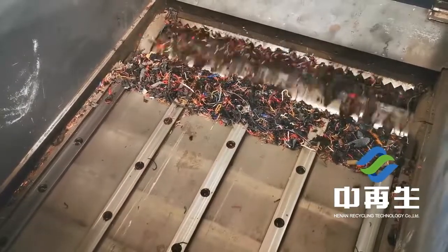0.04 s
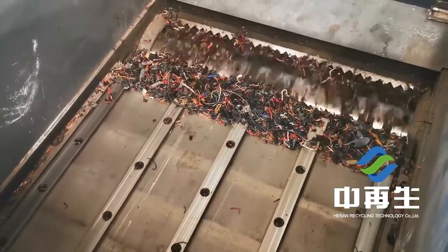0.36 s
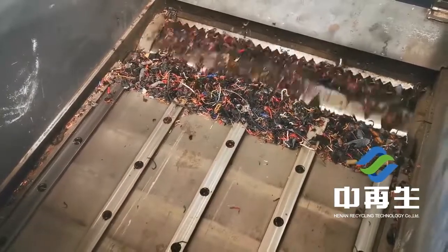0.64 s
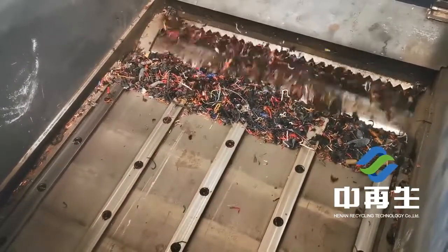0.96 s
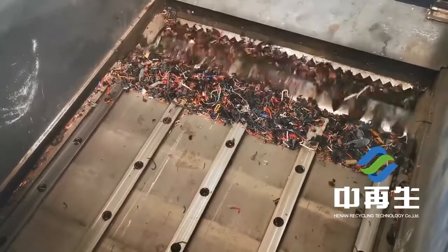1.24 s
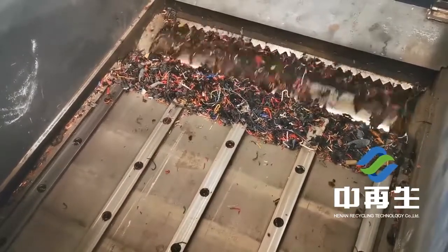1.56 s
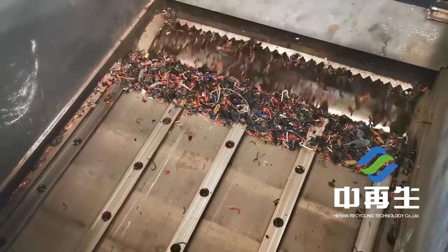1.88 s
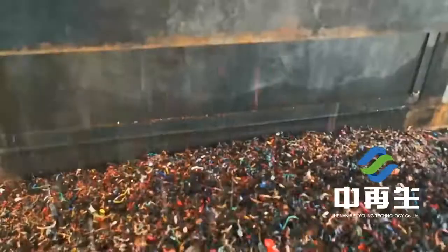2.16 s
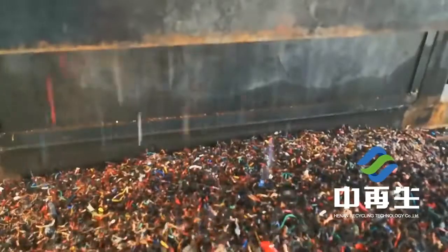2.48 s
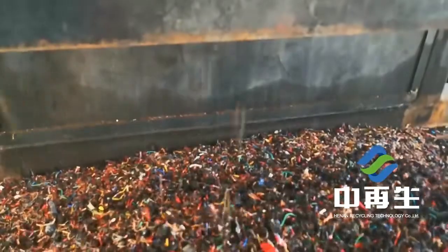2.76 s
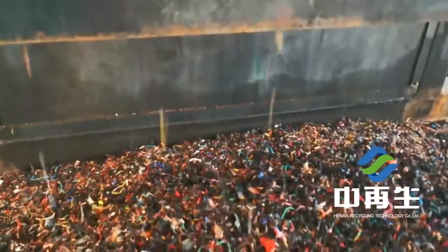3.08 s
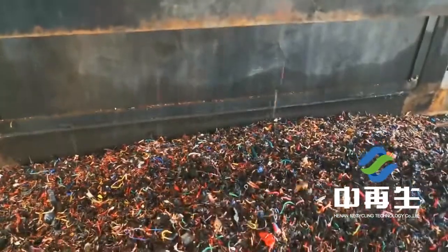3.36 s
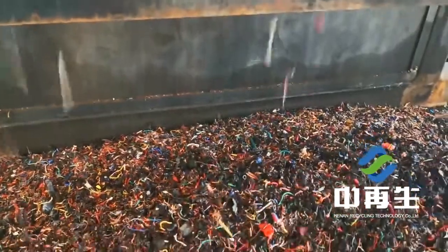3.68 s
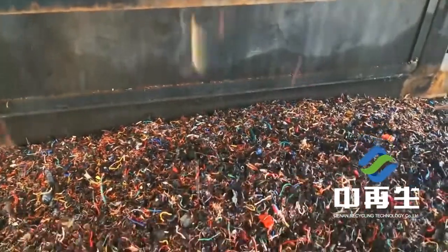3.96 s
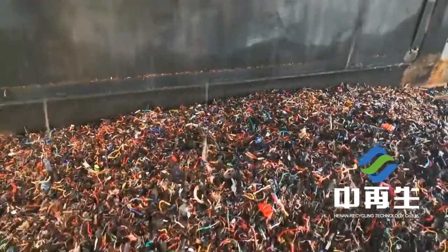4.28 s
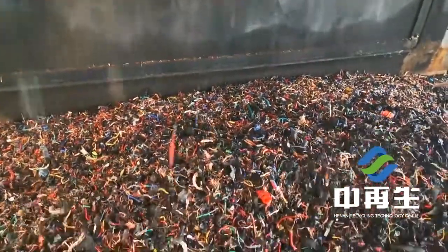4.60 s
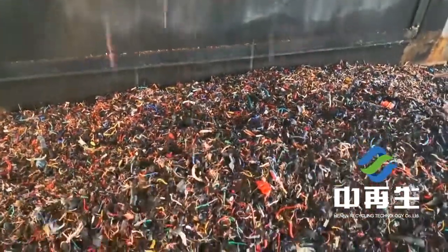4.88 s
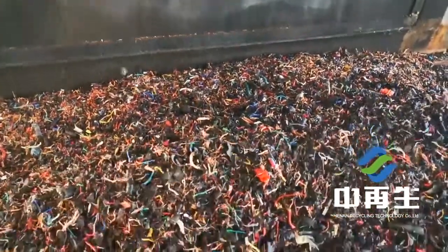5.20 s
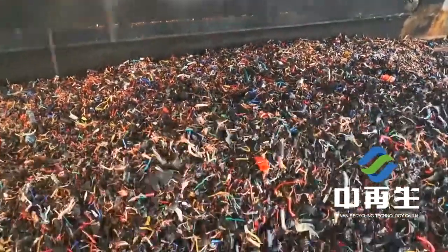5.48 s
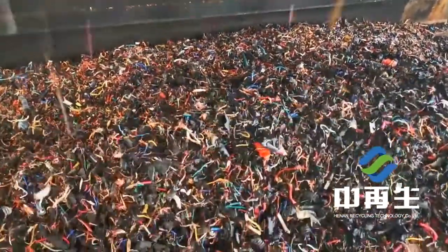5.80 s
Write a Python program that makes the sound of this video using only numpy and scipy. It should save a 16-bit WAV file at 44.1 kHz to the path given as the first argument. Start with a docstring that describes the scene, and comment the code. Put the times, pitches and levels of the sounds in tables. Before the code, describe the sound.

From the start, an industrial shredder is heard close to its feed chamber. The rotor throbs deeply and the steel housing rumbles and chugs unevenly. Knives tear through cable wire in quick, crunching, snapping surges, with dull knocks, bright clatter and a few short squeals, mostly in the first second. At about 2.1 seconds everything cuts to silence.

At about 2.4 seconds the sound returns at the discharge bin. The steel walls give a low, pulsing drone while chopped wire patters densely onto a pile over dull grinding, with scattered crisp ticks. Heavier scraps thud and clang now and then, most clearly near 2.7 and 5.5 seconds. A thin, high whine peaks around 4 seconds and fades by 4.5. The chugging is strongest near 3 seconds and from 4.2 to 5, dips briefly, then carries on with the patter until the end at about 6 seconds.

```python
"""At an industrial shredder grinding cable wire: by the open feed chamber, then at the discharge bin.
At the feed, the rotor throbs and shakes the chugging steel housing, while its knives tear the wire in
crunching surges and knock on thick pieces. A short silence separates the two places.
At the bin, the walls drone and chug, chopped wire patters on the pile, heavy scraps thud on the floor
and the drive's thin whine comes and goes."""
import sys
import numpy as np
from scipy import signal
from scipy.fft import rfft, irfft, next_fast_len
from scipy.io import wavfile
from scipy.ndimage import uniform_filter1d

SR = 44100
rng = np.random.default_rng(int(sys.argv[2]) if len(sys.argv) > 2 else 0)


def to_wav(s):
    """Save 16-bit WAV."""
    ch = np.atleast_2d(s).T  # columns
    pcm = np.round(np.clip(ch, -1, 1) * 32767)  # PCM
    wavfile.write(sys.argv[1], SR, pcm.astype(np.int16))


N = 266364
T = np.arange(N) / SR
FFT_SIZE = next_fast_len(N + 8192)
HZ = np.maximum(np.arange(FFT_SIZE // 2 + 1) * SR / FFT_SIZE, 1)
FEED_END_S, BIN_START_S = 2.09, 2.365
MIC_SPACING_M, SOUND_M_PER_S = 0.11, 343

# The body of the steel housing. Each row: pitch in Hz, nominal width in Hz, relative level in dB.
HOUSING_RESONANCES = [(69.1, 8.8, -27.5), (83, 14, -31.5), (112, 22, -33), (141.7, 19, -28.5),
                      (162.4, 8.3, -28), (175.3, 7, -30.5), (185.6, 30, -29.5), (210, 75, -30.5),
                      (275, 28, -33.5), (321, 45, -32), (444, 63, -36.5)]
# Hard bites make the steel chug. Each row: middle and length in seconds, pitch in Hz, level in dB.
HARD_BITES = [(0.042, 0.059, 166.4, -14), (0.086, 0.028, 160.4, -13.5), (0.285, 0.073, 165.6, -15.5),
              (0.38, 0.088, 168.6, -15.5), (0.73, 0.076, 158.2, -14.5), (0.8, 0.078, 163, -15.5),
              (1.076, 0.047, 161.4, -14.5), (1.301, 0.051, 152.7, -15), (1.339, .043, 162, -17),
              (1.545, 0.071, 162.2, -16), (1.634, 0.04, 163.3, -16), (1.693, .076, 163, -15),
              (2.604, 0.037, 157, -14), (2.678, 0.084, 151, -15), (2.869, 0.074, 164.6, -14),
              (2.925, 0.063, 153.5, -13), (2.975, 0.046, 150, -10.5), (3.011, 0.038, 146, -16),
              (3.061, 0.046, 156.2, -14.5), (3.115, 0.064, 159.2, -15), (3.338, 0.15, 148.6, -15.5),
              (4.164, 0.044, 151, -14.5), (4.237, 0.081, 160.2, -14), (4.299, 0.038, 147, -12.5),
              (4.347, 0.048, 151, -9.5), (4.401, 0.036, 138.4, -12.5), (4.432, .038, 147.9, -14),
              (4.491, 0.086, 158.5, -11), (4.542, 0.064, 146.2, -12.5), (4.669, 0.041, 151.9, -16),
              (4.721, 0.053, 143, -14), (4.795, 0.11, 151.5, -11.5), (4.863, 0.095, 156, -14),
              (4.934, .066, 159.3, -14.5), (5.474, 0.067, 156, -16.5), (5.986, 0.042, 155.7, -14.5)]
# The knives tear into a bunch of wire. Each row: start and length in seconds, snapping level in dB.
WIRE_TEARS = [(0.052, 0.06, -38), (0.188, 0.05, -37), (0.239, 0.045, -37), (0.306, 0.06, -37.5),
              (0.378, 0.083, -37), (0.482, 0.016, -34.5), (0.547, 0.084, -34), (0.743, 0.055, -36),
              (0.893, 0.05, -35), (0.955, 0.015, -30.5), (1.259, 0.072, -35.5), (1.427, 0.037, -32.5),
              (1.564, 0.093, -35.5), (1.776, 0.018, -42.5)]
# The colour of breaking wire at the feed. Each row: frequency in Hz, relative gain in dB.
FEED_WIRE_EQ = [(60, -8.5), (350, -1.5), (550, -1), (750, -4.5), (1150, -6), (1500, -10.5), (1900, -11.5),
                (2400, -12.5), (3200, -17.5), (5000, -17.5), (7500, -27), (9000, -22.5), (11000, -32),
                (15500, -35)]
# Knives knock on thick pieces. Each row: start in seconds, level in dB.
KNIFE_KNOCKS = [(.017, -30), (0.176, -19.5), (.415, -20), (0.55, -21.5), (0.703, -24), (.743, -25),
                (.889, -26), (1.008, -30), (1.092, -29.5), (1.193, -25), (1.339, -23)]
# Hard lumps clatter against the steel. Each row: start in seconds, level in dB.
LUMP_HITS = [(.254, -33), (.335, -28.5), (0.4902, -35), (.606, -30.5), (1.268, -35), (1.31, -24.5),
             (1.428, -31.5), (1.447, -28.5), (1.588, -31.5), (1.655, -28)]
# Wire squeals on the blades. Each row: start and length in seconds, pitch in Hz, level in dB.
BLADE_SQUEALS = [(0.08, 0.026, 2020, -32.5), (0.23, 0.056, 2490, -43), (0.392, .012, 2350, -33),
                 (.487, .014, 2170, -40), (.56, .055, 2200, -44.5), (1.79, 0.011, 13170, -48.5)]
# Thin rings of the cutting chamber. Each row: pitch in Hz, nominal width in Hz, relative level in dB.
CHAMBER_RESONANCES = [(1082, 8.1, -49), (1864, 48, -45), (2106, 8.4, -48.5)]

# How hard the machine shakes the bin walls. Each row: time in seconds, drone level in dB.
DRONE_LEVELS = [(2.38, -24.5), (2.64, -24), (2.79, -21.5), (2.95, -20), (3.2, -23), (3.34, -19),
                (3.57, -21.5), (3.72, -26.5), (4.03, -22.5), (4.2, -20.5), (4.34, -22.5), (4.52, -17.5),
                (4.62, -20.5), (4.81, -15), (4.95, -19), (5.24, -33.5), (5.48, -22.5), (6.04, -20)]
# Strong, lightly damped wall modes that beat together. Each row: pitch in Hz, relative level in dB.
STRONG_WALL_MODES = [(129.4, -6.5), (150.7, -1), (166.6, -5), (174.5, -16.5)]
# Weaker wall modes under them. Each row: pitch in Hz, nominal width in Hz, relative level in dB.
WEAK_WALL_MODES = [(83, 1.5, -22), (102.4, 3.9, -17), (131, 13, -11), (153, 82, -15), (173.6, 12, -16),
                   (209.9, 9.5, -15)]
# The colour of chopped wire at the bin. Each row: frequency in Hz, relative gain in dB.
BIN_WIRE_EQ = [(60, -36), (350, 5.5), (550, 2), (720, 4), (900, -3), (1060, -3), (1500, -8), (2100, -8.5),
               (2500, -14), (3200, -17), (4400, -15.5), (5400, -17.5), (7800, -27.5), (9100, -20.5),
               (11000, -24.5), (15500, -32)]
# The stream of falling wire. Each row: time in seconds, patter level in dB.
PATTER_LEVELS = [(2.37, -38.5), (2.7, -37.5), (3.0, -38), (3.27, -38), (4.2, -38), (4.37, -39), (4.88, -39),
                 (5.1, -38.5), (5.42, -38.5), (5.66, -38.5), (6.04, -38.5)]
# Heavy scraps land. Each row: start in seconds, then hollow thud, bright clang and plate ring in dB.
SCRAP_DROPS = [(2.489, -38, -36.5, -40), (2.728, -25, -28, -28), (2.908, -30, -34.5, -44),
               (3.02, -33, -46, -40), (3.234, -28.5, -36, -49), (3.42, -29, -36, -32),
               (3.819, -32, -34.5, -37), (4.024, -34, -36, -34), (4.463, -30, -45, -32),
               (4.765, -30, -34, -38), (5.547, -27.5, -32.5, -23), (5.578, -31.5, -40, -33),
               (5.849, -35, -36.5, -48)]
# The hollow voice of the bin floor. Each row: pitch in Hz, nominal width in Hz, relative level in dB.
FLOOR_RESONANCES = [(465, 120, -4.5), (690, 130, -3), (1260, 590, -8)]
# Single bits of copper tick on the pile. Each row: start in seconds, level in dB.
COPPER_TICKS = [(2.4238, -33), (2.4632, -36), (2.726, -32), (2.7555, -38), (2.9376, -43), (3.1117, -36),
                (3.2728, -33), (3.4524, -37), (3.9024, -38), (5.2459, -35), (5.3501, -38), (5.4075, -37),
                (5.857, -35), (5.9177, -41)]
# The drive's whine comes and goes. Each row: time in seconds, level in dB.
WHINE_LEVELS = [(2.37, -49.5), (2.9, -53.5), (3.3, -47), (3.65, -50), (3.95, -45), (4.2, -47.5), (4.5, -61),
                (6.04, -63)]
# Rough singing around the whine. Each row: pitch in Hz, nominal width in Hz, relative level in dB.
SCRAPE_RESONANCES = [(2085, 60, -64), (2240, 340, -62), (2277, 110, -56), (2345, 59, -63)]
# The rumble of the machine frame. Each row: pitch in Hz, nominal width in Hz, relative level in dB.
FRAME_RESONANCES = [(45.6, 7.4, -44.5), (78.6, 12, -36), (240, 19, -39.5), (286.7, 22, -39),
                    (321.7, 38, -40.5), (459, 40, -44)]

# The right microphone's duct rings most at odd multiples of its quarter-wave tone.
# Each row: pitch in Hz, nominal width in Hz, ring level in dB at the feed, then at the bin.
DUCT_RESONANCES = [(2286, 498, 6.5, 15.5), (2930, 210, 3, 8), (6755, 1360, 8.5, 15), (10900, 580, 14, 17),
                   (12300, 1940, 7, 14), (15480, 2000, 0.5, 13.5)]
# The stereo lean, apart from the duct. Each row: frequency in Hz, right over left in dB.
STEREO_LEAN = [(60, -2.5), (170, -1.96), (500, 3), (1200, 2), (3500, -1.5), (9000, 0)]


def rotor(throb, throb_db=-26, shudder_db=-32.5):
    """The knife rows throb, and a second low tone of the machine beats against them."""
    return undb(throb_db) * throb + undb(shudder_db) * tone(44.5, waver=0.0089)


def housing(gain_db=-19, steady_s=0.11):
    """Countless cuts shake the steel: close modes beat, and the boom gives way to each chug."""
    steel = diffuse(1, resonances(HOUSING_RESONANCES))
    slow_rms = np.sqrt(uniform_filter1d(steel.mean(0) ** 2, int(steady_s * SR)))
    rumble = undb(gain_db + wander(12)) * steel / slow_rms
    boom = shape(rumble, resonance(159, 70) ** 2)
    return rumble - boom + chugging(boom)


def chugging(droning, reach=1.28):
    """Each hard bite drives the walls at one pitch and ducks their drone for `reach` times its length."""
    middles, _, hz, _ = np.transpose(HARD_BITES)
    force = np.max([undb(db) * bump(middle, length) for middle, length, _, db in HARD_BITES], axis=0)
    duck = np.max([bump(middle, length * reach) for middle, length, _, _ in HARD_BITES], axis=0)
    return droning * (1 - duck) + force * tone(np.interp(T, middles, hz), waver=0.002)


def cutting(throb, grinding_db=-33, snapping_db=-37.5):
    """The knives grind the bundle and snap its copper strands, harder in every tear."""
    tearing = np.sqrt(sum((undb(db) * swell(start, length, attack=0.01, release=0.053)) ** 2
                          for start, length, db in WIRE_TEARS))
    grind = np.hypot(undb(grinding_db), undb(-2.5) * tearing)
    crunch = np.hypot(undb(snapping_db), tearing)
    bite = undb(0.46 * throb)  # the load rises each time a knife row passes
    dull, bright = wire_bands(FEED_WIRE_EQ, split_hz=780)
    grinding = diffuse(grind * bite * grains(rate=490, spread_db=-1.5, t60=0.048), dull)
    snapping = diffuse(crunch * grains(rate=1800, spread_db=0.3, t60=0.09), bright)
    crisp = unit(resonance(11000, 9000) * above(6000, order=2))
    crackle = diffuse(undb(-21) * crunch * grains(rate=240, spread_db=2.5, t60=0.008), crisp)
    strands = undb(-4) * crunch * pings(count=1100, low_hz=1493, high_hz=7500, cycles=16, spread_db=2.5)
    return grinding + snapping + crackle + strands


def knocks():
    """A knife meets a thick piece: a dull knock that rings the cutter block."""
    starts, levels_db = np.transpose(KNIFE_KNOCKS)
    dull = unit(resonance(360, 360) * above(230) * resonance(630, 1500))
    block = struck(starts, levels_db, hz=468, t60=0.087)
    return diffuse(blows(starts, levels_db, t60=0.019), dull) + block


def clatter():
    """Hard lumps hit the steel, each breaking in a quick run of bright cracks."""
    cracks = grains(rate=520, spread_db=1.5, t60=0.017)
    bright = unit(colour(FEED_WIRE_EQ) * above(1200, order=2) * resonance(4100, 9000))
    return diffuse(cracks * blows(*np.transpose(LUMP_HITS), t60=0.12), bright)


def squeals():
    """Wire scrapes on the blades in short bursts of narrow, pitched noise."""
    return sum(diffuse(undb(db) * swell(start, length, attack=0.0055, release=0.047),
                       unit(resonance(hz, 0.14 * hz) ** 2))
               for start, length, hz, db in BLADE_SQUEALS)


def bin_walls(drone, load):
    """The shaken walls sing and chug on beating tones, and weaker modes swell with the load."""
    singing = sum(undb(db) * tone(hz, waver=0.0088, sway_db=2.5) for hz, db in STRONG_WALL_MODES)
    jolts = undb(0.51 * wander(32))  # uneven bites make the drone throb
    strong = chugging(jolts * drone * singing / singing.std())
    weak = diffuse(undb(-21.5) * load ** 0.42, resonances(WEAK_WALL_MODES))
    return strong + weak


def chopped_wire(load, grinding_db=-34.5, clump_db=1.08):
    """Wire patters down in clumps over dull grinding; bits landing close by stand out in bunches."""
    dull, bright = wire_bands(BIN_WIRE_EQ, split_hz=1420)
    grind = undb(grinding_db) * load ** 0.15
    grinding = diffuse(grind * grains(rate=660, spread_db=-1, t60=0.1), dull)
    stream = fader(PATTER_LEVELS) * undb(clump_db * wander(21))
    patter = diffuse(stream * grains(rate=4000, spread_db=3.5, t60=0.089), bright)
    bunches = undb(-4.5 + 3.5 * np.tanh(wander(16)))
    near_bits = pings(count=900, low_hz=4000, high_hz=13500, cycles=18, spread_db=3.5)
    return grinding + patter + bunches * stream * near_bits


def scraps():
    """Heavy scraps thud and clang on the bin floor, whose plate rings briefly."""
    starts, thud_db, clang_db, ring_db = np.transpose(SCRAP_DROPS)
    thuds = diffuse(blows(starts, thud_db, t60=0.21), resonances(FLOOR_RESONANCES))
    plate = struck(starts, ring_db, hz=685, t60=0.1)
    rattle = grains(rate=450, spread_db=1, t60=0.025)  # loose pieces jump and settle after each drop
    metallic = unit(resonance(1700, 940) * above(900, order=2))
    clangs = diffuse(rattle * blows(starts, clang_db, t60=0.16), metallic)
    return thuds + plate + clangs


def ticks():
    """Single bits of copper hit the pile with a tiny, crisp tick."""
    crisp = unit(resonance(10000, 7500) ** 2 * above(5500, order=2))
    return diffuse(blows(*np.transpose(COPPER_TICKS), t60=0.015), crisp)


def drive(whine_hz=2235):
    """The drive whines with its octave; a fluttering scrape and a high rasp come and go with it."""
    strength = fader(WHINE_LEVELS)
    whine = tone(whine_hz, waver=0.001078, sway_db=-0.9)
    octave = undb(-11) * tone(2 * whine_hz, waver=0.00097)
    rubbing = (strength / strength.mean()) ** 0.51
    scrape = diffuse(undb(2 * wander(45)) * rubbing, resonances(SCRAPE_RESONANCES))
    spurts = undb(-56 + 4.1 * np.tanh(1.3 * wander(30)))
    rasp = diffuse(spurts * rubbing, unit(resonance(6670, 800) ** 2))
    return strength * (whine + octave) + scrape + rasp


def panel(rest_db=-47, swell_db=-29):
    """A bin panel with two low tones swells up, hums and settles."""
    shaken = undb(rest_db) + undb(swell_db) * swell(start=4.72, length=0.45, attack=0.32, release=0.27)
    return shaken * (tone(243, waver=0.00606) + undb(-7) * tone(212, waver=0.0283))


def frame():
    """The machine frame lays an even rumble under the bin."""
    return diffuse(0.9, resonances(FRAME_RESONANCES))


def chamber():
    """The cutting chamber rings thinly behind the knives."""
    return diffuse(0.71, resonances(CHAMBER_RESONANCES))


def microphones(sound, duct_db):
    """Each band leans to one side, and the right microphone hears through a short, ringing duct."""
    ring_power = sum((undb(db) * resonance(hz, width) ** 1.255) ** 2
                     for (hz, width, *_), db in zip(DUCT_RESONANCES, duct_db))
    lean = np.sqrt(colour(STEREO_LEAN))
    return np.array([shape(sound[0], 1 / lean), shape(sound[1], lean * np.sqrt(1 + ring_power))])


def wire_bands(eq, split_hz, ripple_hz=22.15):
    """Dull grinding and bright snapping filters, finely rippled by plate and room resonances."""
    knots = np.arange(0, SR / 2, ripple_hz)
    uneven = np.interp(HZ, knots, rng.standard_normal(4096)[:len(knots)])
    depth_db = 1.5 * above(515, order=2) * (2 - 1.1 * above(5000, order=1))  # deepest in the mids
    ripple = unit(undb(depth_db * uneven))
    gain, highs = colour(eq), above(split_hz, order=3)
    dull = unit(gain * np.sqrt(1 - highs ** 2) * above(300, order=2), (HZ > 300) & (HZ < 1200))
    bright = unit(gain * highs, (HZ > 1500) & (HZ < 12000))
    return ripple * dull, ripple * bright


def pings(count, low_hz, high_hz, cycles, spread_db):
    """Bits of wire at random moments: each rings for a few cycles at its own pitch, from its own side."""
    t = np.arange(512) / SR
    out = np.zeros((2, N + len(t)))
    for when, pitch, size, side in rng.random((count, 4)):
        hz, start = low_hz * (high_hz / low_hz) ** pitch, int(when * N)
        delays = np.array([[side], [1 - side]]) * MIC_SPACING_M / SOUND_M_PER_S
        turns = hz * np.maximum(t - delays, 0)
        gain = undb(-spread_db * np.log(max(size, 0.03)))
        decay = np.exp(-np.log(1000) * turns / cycles)
        out[:, start:start + len(t)] += gain * np.sin(2 * np.pi * turns) * decay
    return out[:, :N]


def struck(times, levels_db, hz, t60):
    """One plate mode rings after every hit; the level is its rms at the start."""
    force = np.zeros(N)
    force[(times * SR).astype(int)] = undb(levels_db)
    pole = np.exp((2j * np.pi * hz - np.log(1000) / t60) / SR)
    return np.sqrt(2) * signal.lfilter([1], [1, -pole], force).imag


def tone(hz, waver, sway_db=0):
    """A sine of rms near 1 whose pitch wanders by the share `waver` and whose level sways."""
    phase = 2 * np.pi * np.cumsum(hz * (1 + waver * wander(20))) / SR
    return np.sqrt(2) * np.sin(phase) * undb(sway_db * wander(8.2))


def diffuse(envelope, gain):
    """Filtered noise under an envelope, arriving from all sides: centred bass, wide treble."""
    likeness = np.sinc(2 * HZ * MIC_SPACING_M / SOUND_M_PER_S) * np.exp(-(HZ / 2000) ** 2)
    noise = envelope * rng.standard_normal((2, N))
    mid, side = shape(noise, gain * np.sqrt([1 + likeness, 1 - likeness]))
    return np.array([mid + side, mid - side])


def grains(rate, spread_db, t60):
    """Envelope of random snaps of uneven size, about `rate` a second; mean power 1."""
    sizes = undb(spread_db * np.minimum(rng.exponential(size=N), 4))
    power = fade((rng.random(N) < rate / SR) * sizes ** 2, t60)
    return np.sqrt(power / power.mean())


def blows(times, levels_db, t60):
    """Envelope of hits that each die away."""
    power = np.zeros(N)
    power[(times * SR).astype(int)] = undb(levels_db) ** 2
    return np.sqrt(fade(power, t60))


def fade(power, t60):
    """Give every pulse of power a tail that falls 60 dB in t60 seconds."""
    feedback = undb(-120 / (t60 * SR))
    return signal.lfilter([1], [1, -feedback], power)


def swell(start, length, attack, release):
    """Envelope that rises, holds until its length is over, then falls; all in seconds."""
    return np.clip(np.minimum((T - start) / attack, 1 - (T - start - length) / release), 0, 1)


def bump(middle, length):
    """Envelope that swells smoothly to 1 and dies again."""
    return np.cos(np.pi * np.clip((T - middle) / length, -0.5, 0.5)) ** 2


def wander(rate):
    """Drift: straight lines between random values, `rate` times a second."""
    return np.interp(T * rate, np.arange(512), rng.standard_normal(512))


def fader(points):
    """A gain ride through (seconds, dB) points."""
    return undb(np.interp(T, *np.transpose(points)))


def colour(points):
    """An EQ curve through (Hz, dB) points."""
    hz, db = np.transpose(points)
    return undb(np.interp(np.log(HZ), np.log(hz), db))


def resonances(modes):
    """EQ curve of a set of (Hz, nominal width in Hz, rms dB) peaks, each sharpened by squaring."""
    return np.sqrt(sum((undb(db) * unit(resonance(hz, width) ** 2)) ** 2 for hz, width, db in modes))


def resonance(hz, width):
    """EQ curve of one resonant peak."""
    return 1 / np.sqrt(1 + ((HZ / hz - hz / HZ) * hz / width) ** 2)


def above(hz, order=4):
    """EQ curve of a high-pass."""
    return 1 / np.sqrt(1 + (hz / HZ) ** (2 * order))


def shape(sound, gain):
    """Filter a sound through an EQ curve."""
    return irfft(rfft(sound, FFT_SIZE) * gain, FFT_SIZE)[..., :N]


def unit(gain, band=1):
    """Scale an EQ curve so that white noise comes out with rms 1 inside the band."""
    return gain / np.sqrt(np.mean((gain * band) ** 2))


def undb(db):
    """Decibels to gain."""
    return 10 ** (np.asarray(db) / 20)


def scene():
    """The feed chamber, a hard cut to a short silence, then the bin."""
    throb = tone(hz=37.1, waver=0.009, sway_db=3)  # one cycle for each passing knife row
    at_feed = rotor(throb) + housing() + cutting(throb) + knocks() + clatter() + squeals() + chamber()
    drone = fader(DRONE_LEVELS)
    load = drone / drone[T > BIN_START_S].mean()
    at_bin = bin_walls(drone, load) + chopped_wire(load) + scraps() + ticks()
    at_bin += drive() + panel() + frame()
    _, _, feed_duct_db, bin_duct_db = np.transpose(DUCT_RESONANCES)
    return (microphones(at_feed, feed_duct_db) * (T < FEED_END_S)
            + microphones(at_bin, bin_duct_db) * (T >= BIN_START_S))


def record(dry):
    """A steep low-pass takes off the air above 15.8 kHz."""
    return signal.sosfilt(signal.ellip(10, 0.2, 80, 15800, fs=SR, output="sos"), dry)


dry = scene()
out = record(dry)
to_wav(out)
```